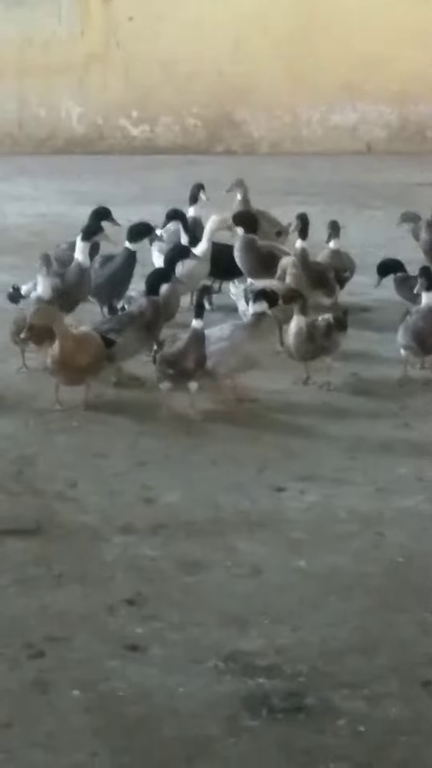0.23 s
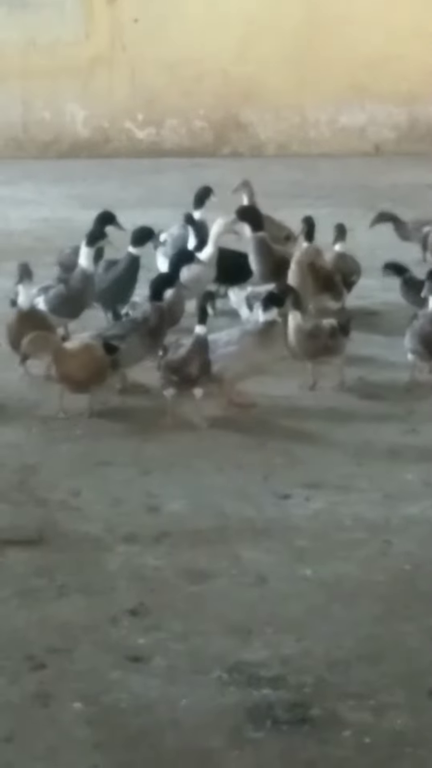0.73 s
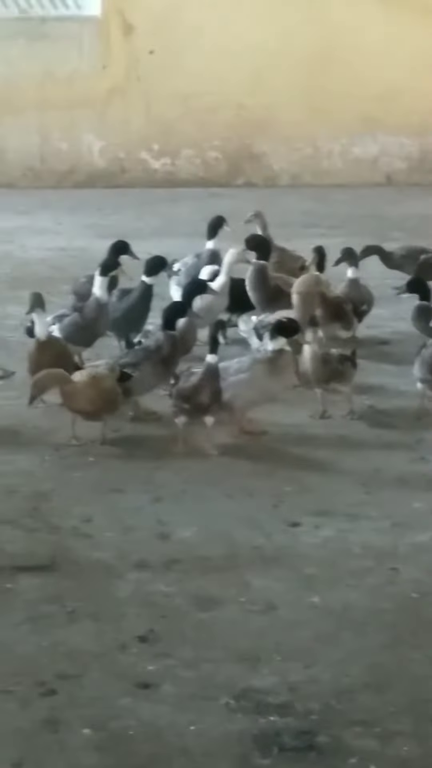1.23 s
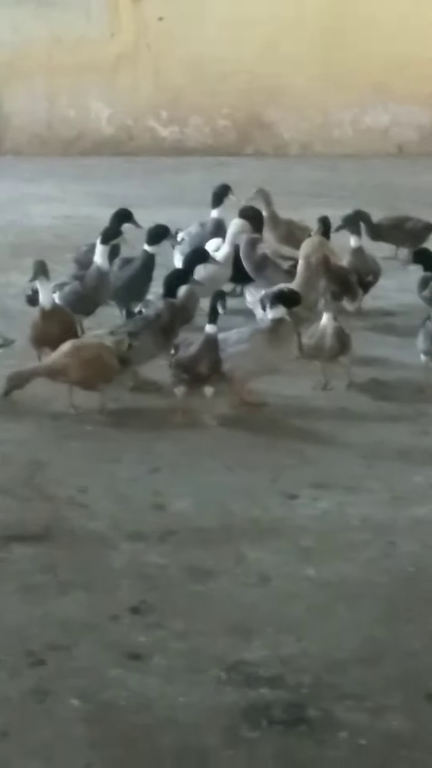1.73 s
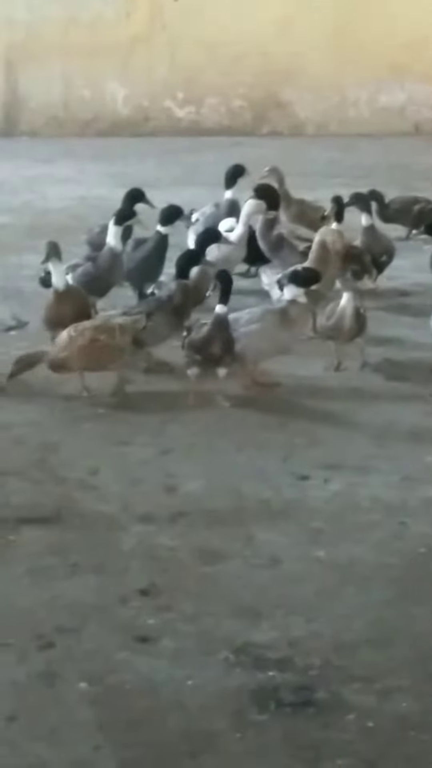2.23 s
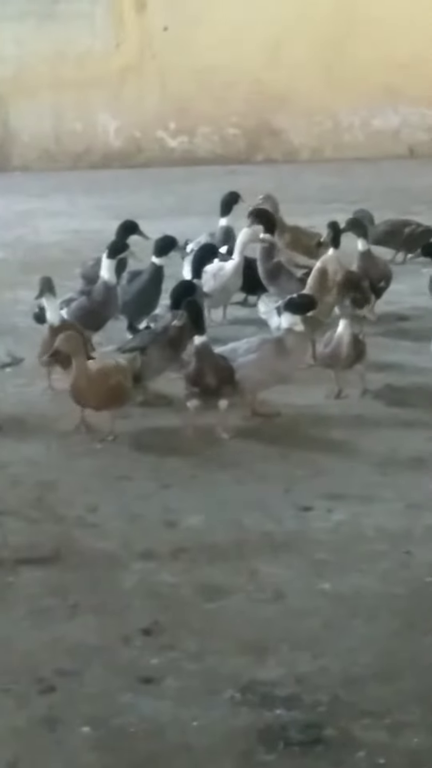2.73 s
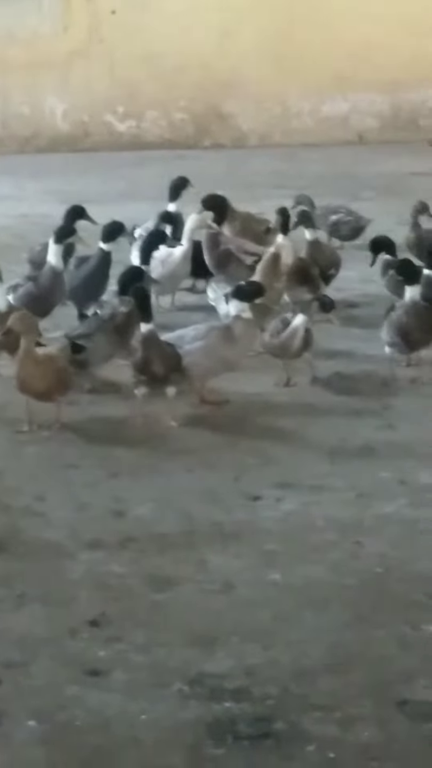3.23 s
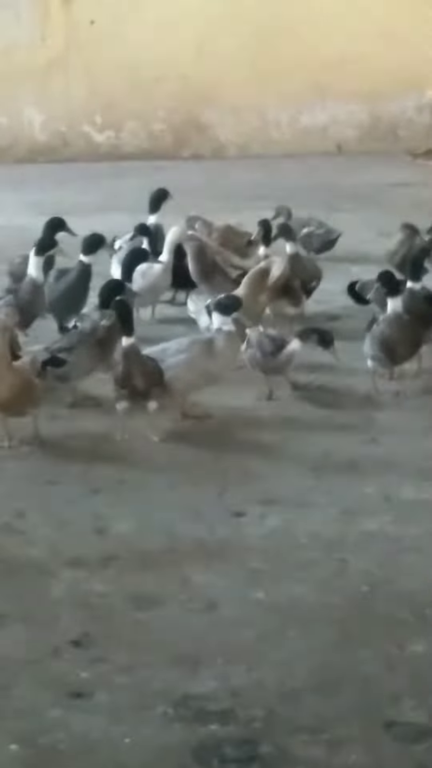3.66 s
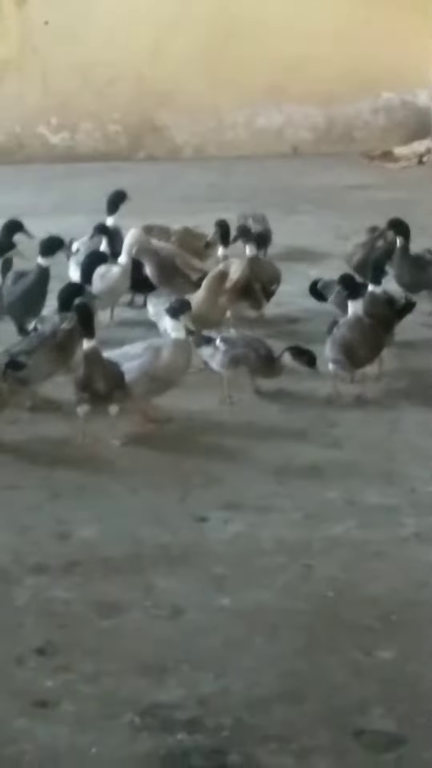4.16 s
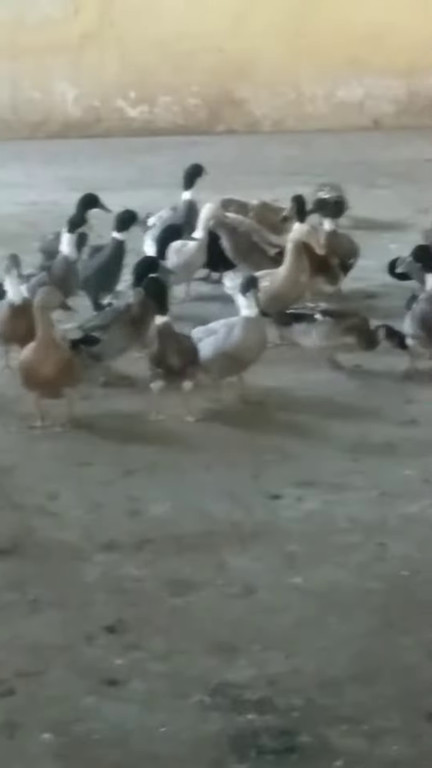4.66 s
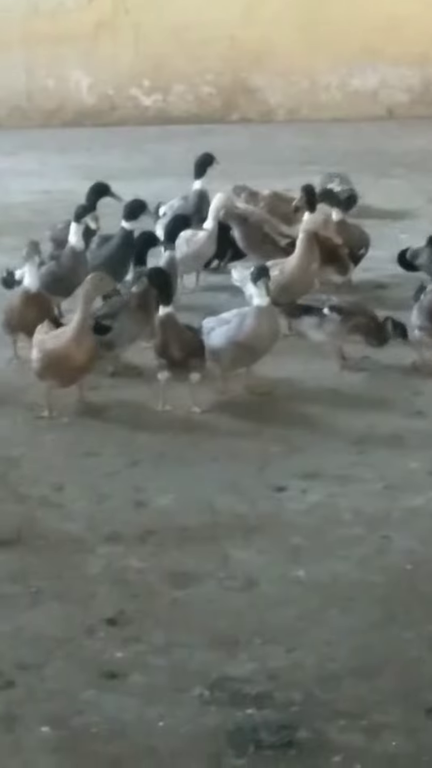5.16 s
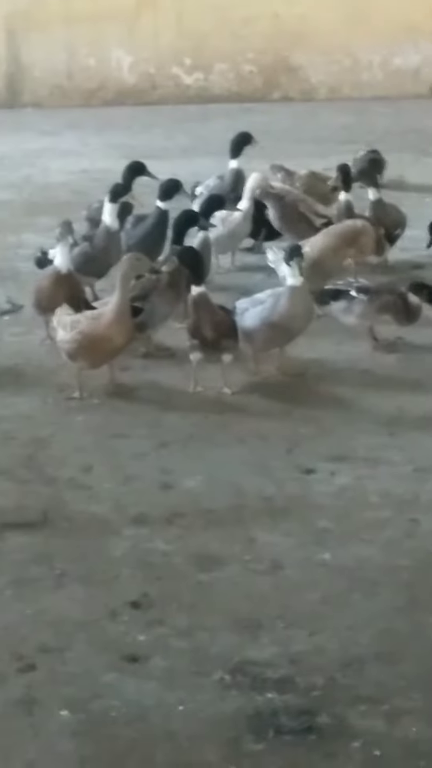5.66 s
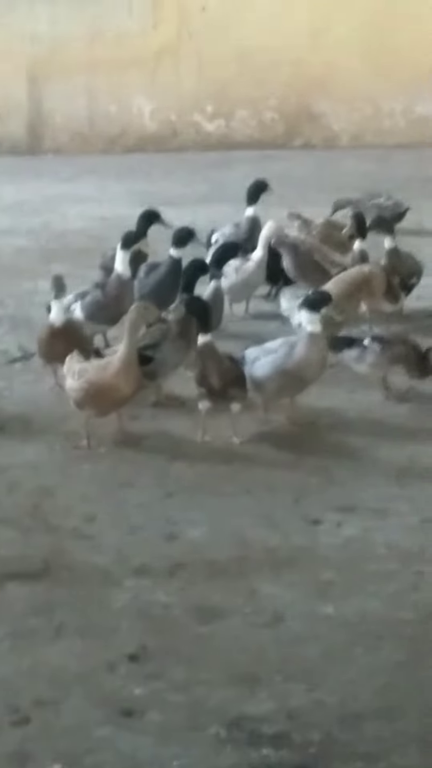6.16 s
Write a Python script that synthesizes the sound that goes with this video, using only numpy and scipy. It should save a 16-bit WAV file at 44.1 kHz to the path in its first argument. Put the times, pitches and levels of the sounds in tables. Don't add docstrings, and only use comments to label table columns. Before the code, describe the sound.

Several ducks a few metres away in a walled concrete yard. Short, hoarse, nasal quacks begin at once and run on about four a second, with a sharp tick far left early. After a lull with two faint peeps, a second run starts, then a few louder quacks and a quiet end. Breathy drake rasps fall between. Stereo microphones catch a hard, short reverberation and soft shuffling.

```python
import sys
import numpy as np
from scipy import signal
from scipy.fft import rfft, irfft, next_fast_len
from scipy.io import wavfile
from scipy.ndimage import uniform_filter1d, map_coordinates

SR = 44100
rng = np.random.default_rng(int(sys.argv[2]) if len(sys.argv) > 2 else 0)


def dump_mix(stems):
    frames = np.atleast_2d(stems).T
    limited = np.clip(frames, -1, 1)
    pcm = np.round(limited * 32767).astype(np.int16)
    wavfile.write(sys.argv[1], SR, pcm)


def voltage_ratio(level):
    return 10 ** (np.asarray(level, float) / 20)


N = 282063


def unit(x):
    return x / np.sqrt(np.mean(x ** 2) + 1e-20)


def noise(count):
    return rng.standard_normal(SR // 4)[:count]


def along(points, hz):
    point_hz, value = np.transpose(points)
    return np.interp(np.log(hz + 1), np.log(point_hz + 1), value)


def filtered(x, response):
    n = x.shape[-1]
    m = next_fast_len(n + 4096)
    return irfft(rfft(x, m) * response(np.fft.rfftfreq(m, 1 / SR)), m)[..., :n]


def shaped(x, points):
    return filtered(x, lambda hz: voltage_ratio(along(points, hz)))


def resonant(x, modes, size=1):
    def response(hz):
        total = 0
        for k, (centre_hz, width_hz, level_db) in enumerate(modes):
            damping = 1j * hz * width_hz
            total = total + (-1) ** k * voltage_ratio(level_db) * damping / ((centre_hz * size) ** 2 - hz * hz + damping)
        return total
    return filtered(x, response)


RISE_DB, FALL_DB = 23, 24
RISE_BEND, FALL_BEND = 1.9, 1.8


def swelling(rise_s, fall_s):
    t = np.arange(-rise_s, fall_s, 1 / SR)
    gate = np.clip(np.minimum(t + rise_s, fall_s - t) / 0.0069, 0, 1)
    rise_drop_db = RISE_DB * np.abs(t / rise_s) ** RISE_BEND
    fall_drop_db = FALL_DB * np.abs(t / fall_s) ** FALL_BEND
    return t, gate, np.where(t < 0, rise_drop_db, fall_drop_db)


# hz, likeness (0-1)
LIKENESS = [(60, 0.63), (290, 0.93), (640, 0.85), (1400, 0.56), (3000, 0.023)]


def paired(pair):
    def turns(hz):
        angle = np.arccos(np.clip(along(LIKENESS, hz), -1, 1)) / 2
        return np.array([np.cos(angle), np.sin(angle)])
    mid, side = filtered(pair, turns)
    return np.array([mid + side, mid - side])


# hz, t60_s
WALL_TAIL = [(200, 0.8), (700, 0.69), (1600, 0.71), (4000, 0.65), (10000, 0.27)]


def add(mix, start_s, x, pan_db, early_db=-2, late_db=-11, early_t60_s=.13):
    hz, t, z = signal.stft(rng.standard_normal((2, SR)), SR, nperseg=256)
    decay = voltage_ratio(-60 * t / along(WALL_TAIL, hz)[:, None])
    late = signal.istft(z * decay, SR, nperseg=256)[1][:, :SR]
    late = filtered(late, lambda f: voltage_ratio(-5 / (1 + (f / 450) ** 4)))
    early = rng.standard_normal((2, SR)) * voltage_ratio(-60 * np.arange(SR) / SR / early_t60_s)
    early = filtered(early, lambda f: voltage_ratio(-7 / (1 + (f / 1100) ** 4)))
    late = voltage_ratio(late_db) * late / np.linalg.norm(late[0])
    early = voltage_ratio(early_db) * early / np.linalg.norm(early[0])
    path = np.pad(paired(late + early), ((0, 0), (60, 0)))
    path[[0, 1], rng.integers(0, 12, size=2) + [0, 4]] += .8
    panned = x * voltage_ratio(np.array([pan_db, -pan_db]).reshape(2, -1) / 2)
    wet = signal.fftconvolve(panned, path, axes=1)
    i = round(start_s * SR)
    mix[:, i:i + wet.shape[1]] += voltage_ratio(2.0) * wet[:, :N - i]


# hz, level_db
HUM_TONE = [(10, -3), (30, -2), (60, -2), (100, 0), (160, -8), (400, -60)]


def rumble():
    return voltage_ratio(-88) * unit(shaped(rng.standard_normal((2, N)), HUM_TONE))


# hz, level_db (per Hz)
AIR_TONE = [(15, -20.5), (25, -31), (59, -29), (118, 1.5), (879, -1.5), (978, -6.5), (1280, -1),
            (2930, -6.5), (3930, -11), (6540, -10.5), (15000, -45)]
# time_s, level_db
AIR_LEVEL = [(0.0, -58), (0.07, -56), (1.67, -54), (2.052, -63.5), (2.6, -66.5), (2.83, -64.5),
             (2.97, -59.5), (3.83, -53), (4.081, -62), (4.36, -65), (4.54, -61.5), (4.88, -56.5),
             (5.54, -68), (5.809, -66), (5.93, -64), (6.4, -70.5)]


def air():
    z = signal.stft(rng.standard_normal((2, N)), nperseg=512)[2]
    patches = uniform_filter1d(rng.standard_normal(z.shape[1:]), 6, 0)
    patches = uniform_filter1d(patches, 12, 1)
    hush = signal.istft(z * voltage_ratio(2 * unit(patches)), nperseg=512)[1][:, :N]
    time_s, level_db = np.transpose(AIR_LEVEL)
    level = voltage_ratio(np.interp(np.arange(N) / SR, time_s, level_db))
    return level * unit(shaped(paired(hush), AIR_TONE))


# start_s, pitch_hz, level_db, t60_s
FOOTFALLS = [
    (6.25, 140, -46, .03),
    (2.01, 420, -59, .07),
]


def footfalls(mix):
    t = np.arange(SR // 10) / SR
    for start_s, pitch_hz, level_db, t60_s in FOOTFALLS:
        onset = 1 - np.exp(-t / .004)
        thud = voltage_ratio(level_db - 60 * t / t60_s) * np.sin(2 * np.pi * pitch_hz * t) * onset
        add(mix, start_s, thud, 3, early_db=-12, late_db=-25)


# start_s, peak_db, pan_db (left-right)
TICKS = [
    (.1942, -14, 22),
    (1.582, -33, .5),
]
# centre_hz, width_hz, level_db
TICK_MODES = [(2240, 210, -1.5), (3220, 260, -1.5), (5000, 1100, 1.5), (6840, 720, 0.5), (7570, 240, 5),
              (9300, 1300, -3), (12900, 1200, -11)]
# centre_hz, width_hz, level_db
NAIL_MODES = [(3150, 400, 0), (6500, 3000, -15), (13500, 2500, -6)]
CONTACT_S = .00003


def ticks(mix):
    t = np.arange(SR // 10) / SR
    for (start_s, peak_db, pan_db), modes in zip(TICKS, [TICK_MODES, NAIL_MODES]):
        snap = resonant(t * np.exp(-t / CONTACT_S), modes)
        add(mix, start_s, voltage_ratio(peak_db) * snap / np.abs(snap).max(), pan_db, early_db=-40, late_db=-48)


# start_s, length_s, pitch_hz, level_db, pan_db (left-right)
PEEPS = [
    (1.888, 0.027, 1240, -53.5, 0),
    (2.001, 0.048, 1174, -52.5, 15),
]


def peeps(mix):
    for start_s, length_s, pitch_hz, level_db, pan_db in PEEPS:
        _, gate, drop_db = swelling(length_s / 2, length_s / 2)
        whistle = np.sin(2 * np.pi * np.cumsum(pitch_hz + .8 * drop_db) / SR)
        level = gate * voltage_ratio(level_db + 6.5 - 0.13 * drop_db)
        add(mix, start_s, level * whistle, pan_db, early_db=-16, late_db=-19.5)


# start_s, rise_s, fall_s, peak_db, pan_db (left-right)
RASPS = [
    (.43, 0.016, 0.099, -46.5, -5.5),
    (1.361, 0.043, 0.022, -36, -1.1),
    (2.175, 0.039, 0.059, -53.5, -1.5),
    (2.506, 0.058, 0.053, -48, 1.3),
    (3.925, 0.057, 0.13, -46.5, .6),
    (4.21, 0.071, 0.042, -49.5, 0.5),
    (5.13, 0.043, 0.09, -56, 1),
    (5.327, 0.03, 0.15, -52.5, 1),
]
# centre_hz, width_hz, level_db (re breath)
RASP_RING = [(5900, 900, -1), (5550, 650, 3), (6800, 900, -12), (5300, 1100, -8), (5600, 900, -16),
             (2300, 700, -8), (2800, 1100, -3), (3100, 600, -9)]
# hz, level_db (per Hz)
RASP_TONE = [(180, -20), (300, 0.5), (550, -13), (627, -2), (1150, -20), (1820, 0.5), (4120, -4.5),
             (5350, -2), (7180, -4), (8600, -19.5), (15000, -37)]
RASP_SWELL = 0.58
FLUTTER_HZ, FLUTTER_DB = 120, 5


def drakes(mix):
    for (start_s, rise_s, fall_s, peak_db, pan_db), ring in zip(RASPS, RASP_RING):
        _, gate, drop_db = swelling(rise_s, fall_s)
        level_db = peak_db - RASP_SWELL * drop_db
        t = np.arange(len(gate)) / SR
        breath = voltage_ratio(FLUTTER_DB * np.sin(2 * np.pi * FLUTTER_HZ * t)) * noise(len(gate))
        hiss = unit(shaped(breath, RASP_TONE))
        bill = voltage_ratio(ring[2]) * unit(resonant(resonant(breath, [ring]), [ring]))
        add(mix, start_s, gate * voltage_ratio(level_db - 8.5) * (hiss + bill), pan_db, late_db=-6.5)


# centre_hz, width_hz, level_db
CHEST = [(264, 84, -4.5), (540, 395, -1), (686, 638, 0.77), (1136, 1030, -9.5)]
THROAT = [(1295, 414, 2.7), (1547, 101, 6.7)]
UPPER_THROAT = [(1779, 230, 3.2), (2493, 180, -5), (2900, 2100, -20.5)]
BILL = [(4207, 510, -6), (5260, 345, -4.5), (6515, 470, -6), (7647, 130, -8)]
# hz, level_db (per Hz)
SHEEN = [(7000, -8), (8600, 7), (10000, 6.5), (12000, -18.5), (13500, -9.5), (15000, -24), (15500, -45)]
CHEST_LINGERS, BILL_LINGERS = 0.23, 0.05
SAG_HZ_PER_S, EFFORT_HZ_PER_DB = 60, 0.08
WAVER, WAVERS_PER_S = .018, 30


def quack(call, effort, overtones_db, doubling, sheen_db):
    _, rise_s, fall_s, peak_db, top_hz = call
    hoarse, chest_db, upper_db, bill_db, size = effort
    size = np.clip(size, .8, 1.1)
    t, gate, drop_db = swelling(rise_s, fall_s)
    level_db = peak_db - drop_db
    pitch_hz = top_hz - SAG_HZ_PER_S * t - EFFORT_HZ_PER_DB * drop_db
    chest_db = chest_db + CHEST_LINGERS * drop_db
    bill_db = bill_db + BILL_LINGERS * drop_db

    waver = map_coordinates(rng.standard_normal(size=16), [(t + rise_s) * WAVERS_PER_S])
    cycle = np.cumsum(pitch_hz * (1 + WAVER * waver)) / SR
    count = np.arange(int(cycle[-1]))
    odd = count % 2
    jitter, shimmer = rng.standard_normal((2, 64))[:, :len(count)]
    phase = count + 0.314 + 0.21 * doubling * odd + .13 * hoarse * jitter
    when = np.interp(phase, cycle, np.arange(len(gate)))
    strength = (1 - doubling * odd) * voltage_ratio(4 * hoarse * shimmer)
    pulses = np.bincount(when.astype(int), strength, len(gate))
    swell = np.interp(cycle, count + .3, strength)
    puff = noise(len(gate)) * voltage_ratio(-12 * ((cycle - .3) % 1)) * swell
    noisy = .75 * np.clip(hoarse, 0, 1)
    source = np.sqrt(1 - noisy) * unit(pulses - pulses.mean()) + np.sqrt(noisy) * unit(puff)

    def soft(x, hz):
        return unit(filtered(x, lambda f: 1 / (1 + 1j * f / hz) ** 3))

    clear = 0
    for k, overtone_db in enumerate(overtones_db):
        clear = clear + voltage_ratio(overtone_db) * np.sin(2 * np.pi * (k + 1) * cycle)
    chest = swell * clear + voltage_ratio(5.0) * soft(resonant(source, CHEST), hz=2730)
    throat = soft(resonant(source, THROAT, size), hz=4270)
    throat = throat - voltage_ratio(upper_db) * soft(resonant(source, UPPER_THROAT, size), hz=4600)
    bill = unit(resonant(puff, BILL, size)) + voltage_ratio(sheen_db) * unit(shaped(puff, SHEEN))
    body = voltage_ratio(-1.0) * throat + voltage_ratio(chest_db - 1.0) * chest + voltage_ratio(bill_db) * bill
    return gate * voltage_ratio(level_db) * body


FAR_HENS = [
    (.375, .03, 0.096, -50, 240.5),
    (.66, .02, 0.047, -48, 250),
    (6.13, .058, 0.097, -69.5, 270.5),
]
FAR_EFFORT = (.8, -12, -3, -19, 1.03)
FAR_VOICE = (1.6, -20, 1.5, -1.7, -5)
FAR_OVERTONES = (-14, 6.5, -29, 8.5)
LOW_HEN = [
    (5.768, .04, .08, -56, 206),
]
LOW_EFFORT = (.15, -2, -9, -19, .82)
LOW_VOICE = (0, -35, 1.5, -6, -14)
LOW_OVERTONES = (-8, 2, -12, 2)
SOFT_HEN = [
    (1.505, 0.034, .1, -42.5, 253.5),
]
SOFT_EFFORT = (.25, -18, -6, -26, 1.0)
SOFT_VOICE = (.4, -27, .5, -1, -11)
SOFT_OVERTONES = (-20, -6, -4, -6)
SIDE_HEN = [
    (.075, 0.038, 0.059, -39.5, 240.8),
]
SIDE_EFFORT = (.8, -10, -5, -9, .98)
SIDE_VOICE = (0.4, -4, 11.5, -4, -17.5)
SIDE_OVERTONES = (-16, 1.5, -5, -5)
RUN_HEN = [(.545, 0.041, 0.1, -44, 257.3), (.795, 0.05, 0.064, -31.5, 261.7),
           (1.04, 0.047, 0.11, -38.5, 259.9), (1.32, 0.06, 0.079, -32.5, 256.9),
           (1.685, 0.032, 0.16, -48, 258), (2.995, 0.058, 0.051, -35.5, 259.4),
           (3.245, 0.053, 0.07, -37.5, 256.1), (3.5, 0.066, 0.046, -37.5, 258.5),
           (3.775, 0.056, 0.042, -34, 254.5), (4.59, 0.052, 0.054, -35, 257.5),
           (4.855, 0.044, 0.072, -34.5, 248.6)]
RUN_EFFORT = [(0.61, -7, 2, -9, 0.996), (0.43, -13, -0.5, -10.5, 1.037), (0.32, -10.5, 0.5, -11.5, 1.03),
              (0.39, -12.5, -2.5, -14.5, 1.05), (0.49, -7, 4, -12.5, 0.99), (0.67, -7, 3.9, -7.5, 1.019),
              (0.56, -11.5, -1.5, -12.5, 1.014), (0.31, -10.5, 1, -12, 1.027), (.3, -12, 1.5, -14.5, 1.025),
              (0.42, -9, 0.5, -10.5, 1.026), (0.47, -13, -2.5, -11, 1.015)]
RUN_VOICE = (0.35, -26.5, -0.06, -1.5, -9.5)
RUN_OVERTONES = (-10.5, -0.5, -9, 2.5)
LEAD_HEN = [
    (.02, 0.044, 0.051, -29.5, 259.5),
    (.268, 0.049, 0.057, -30.5, 255),
    (2.765, .045, 0.079, -33.5, 245.8),
    (4.345, 0.052, 0.063, -29, 248.4),
    (5.86, 0.028, 0.085, -36, 240.3),
]
LEAD_EFFORT = [(0.6, -8, -3, -15.5, 0.988), (0.62, -13.5, -1.5, -22.5, 0.998),
               (0.64, -10.5, 1, -22.5, 0.96), (0.48, -10, -2.1, -23.5, 1.025), (0.3, -6.5, 0, -23.5, 0.95)]
LEAD_VOICE = (0.24, -13.5, 1.5, -1.5, -15)
LEAD_OVERTONES = (-22, -16, 1, -6)


def hens(mix):
    flock = [
        (FAR_HENS, [FAR_EFFORT] * len(FAR_HENS), FAR_VOICE, FAR_OVERTONES),
        (LOW_HEN, [LOW_EFFORT], LOW_VOICE, LOW_OVERTONES),
        (SOFT_HEN, [SOFT_EFFORT], SOFT_VOICE, SOFT_OVERTONES),
        (SIDE_HEN, [SIDE_EFFORT], SIDE_VOICE, SIDE_OVERTONES),
        (RUN_HEN, RUN_EFFORT, RUN_VOICE, RUN_OVERTONES),
        (LEAD_HEN, LEAD_EFFORT, LEAD_VOICE, LEAD_OVERTONES),
    ]
    for calls, efforts, voice, overtones_db in flock:
        doubling, sheen_db, pan_db, early_db, late_db = voice
        for call, effort in zip(calls, efforts):
            sound = quack(call, effort, overtones_db, doubling, sheen_db)
            add(mix, call[0], sound, pan_db, early_db, late_db)


def scene():
    mix = rumble() + air()
    for source in (footfalls, ticks, peeps, drakes, hens):
        source(mix)
    return mix


def low_pass(x):
    return signal.sosfilt(signal.butter(12, 15440, fs=SR, output="sos"), x)


# centre_hz, width_hz, depth (0-1)
PORT_DIPS = [(3840, 124, 0.59), (7910, 630, 0.2)]


def record(dry):
    def microphones(hz):
        port = 1
        for centre_hz, width_hz, depth in PORT_DIPS:
            port = port * (1 - np.clip(depth, 0, 1) / (1 + ((hz - centre_hz) / width_hz) ** 2))
        lean_db = along([(300, 0.85), (1300, -0.17), (2400, 1.0), (6000, -0.7)], hz)
        lean = voltage_ratio(np.outer([1, -1], lean_db))
        bass_cut = 1 / (1 + (90 / (hz + 1)) ** 0.84)
        top_octave = voltage_ratio(-2 / (1 + np.exp((8050 - hz) / 60)))
        return port * lean * (hz < 15150) * bass_cut * top_octave
    return low_pass(filtered(dry, microphones))


dry = scene()
out = record(dry)
dump_mix(out)
```